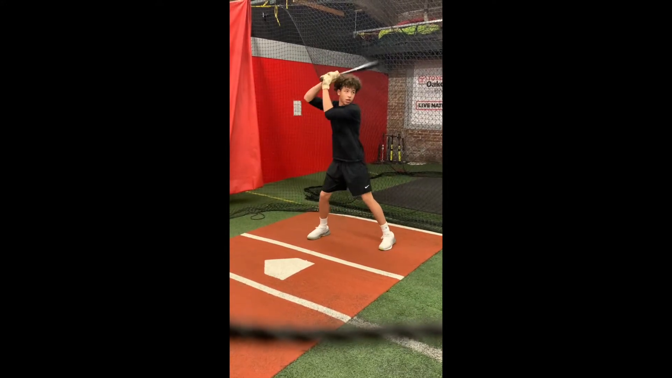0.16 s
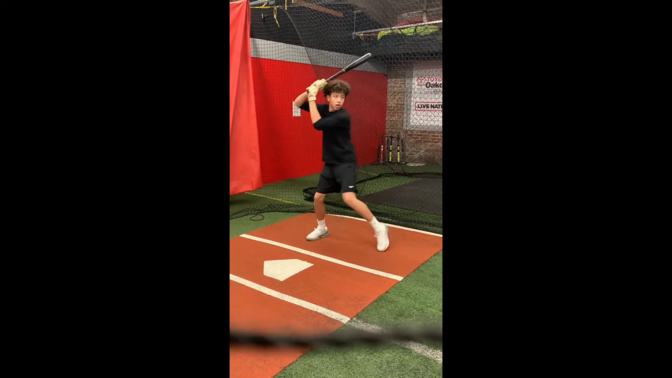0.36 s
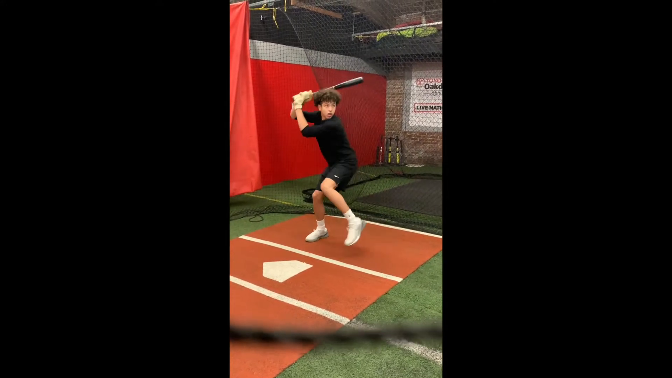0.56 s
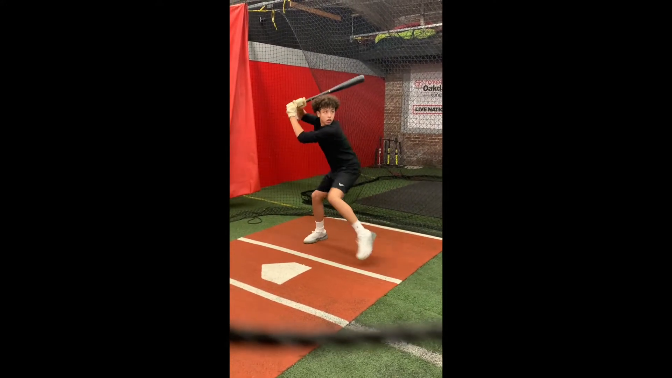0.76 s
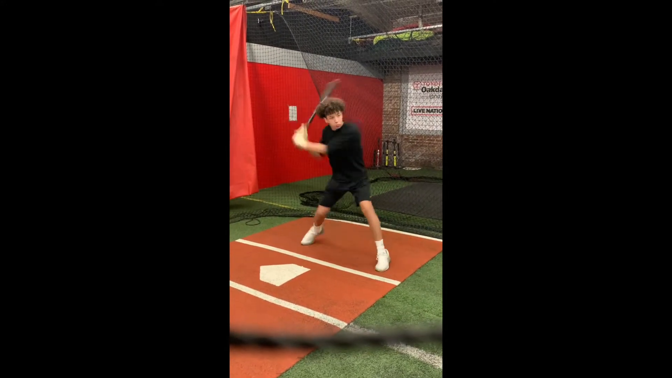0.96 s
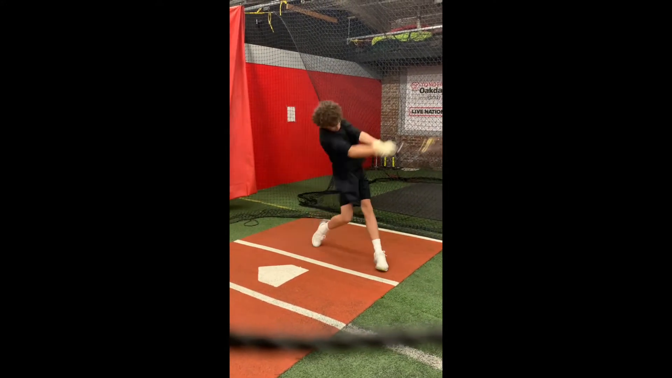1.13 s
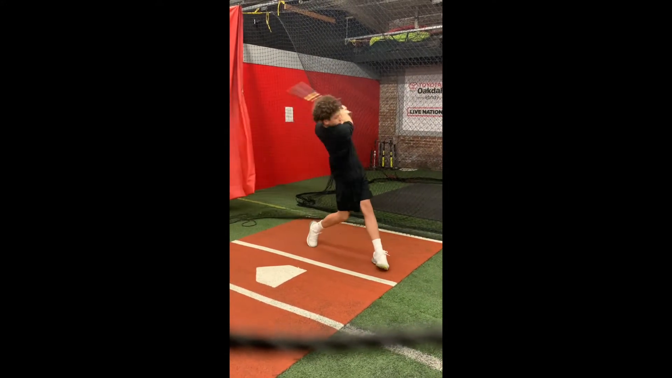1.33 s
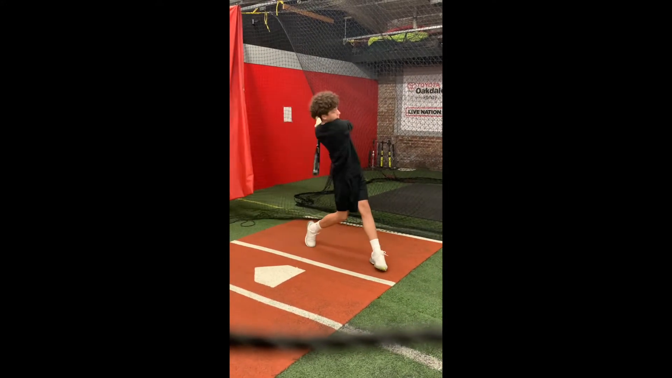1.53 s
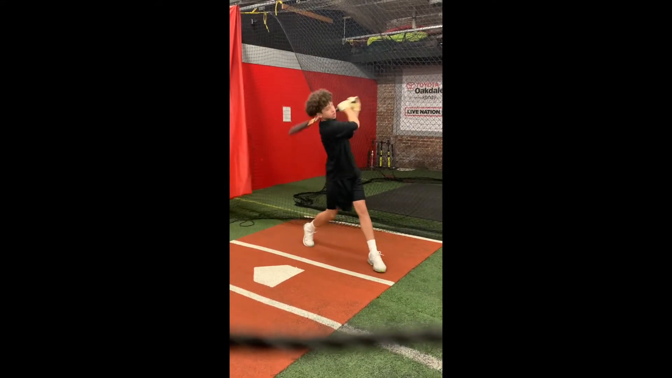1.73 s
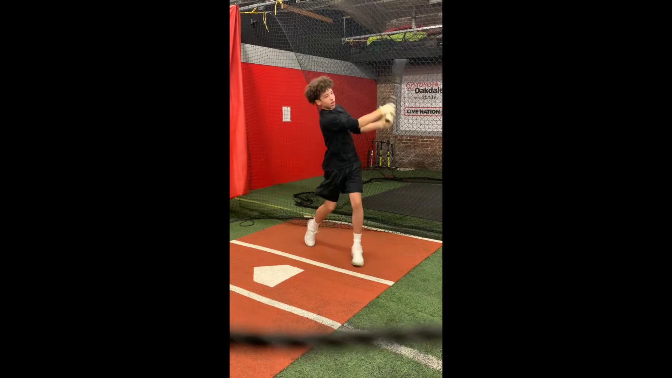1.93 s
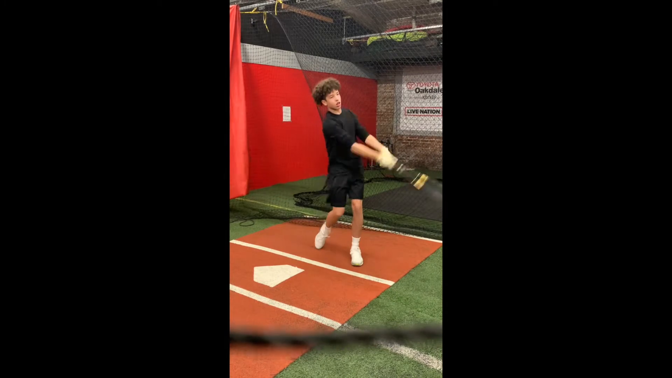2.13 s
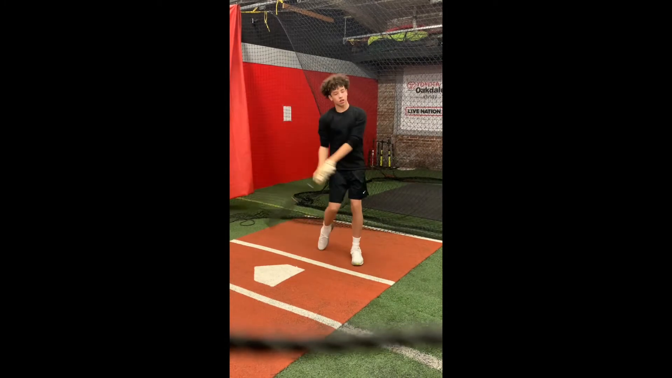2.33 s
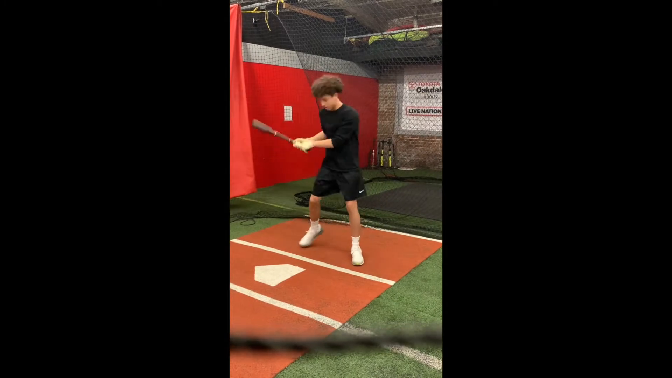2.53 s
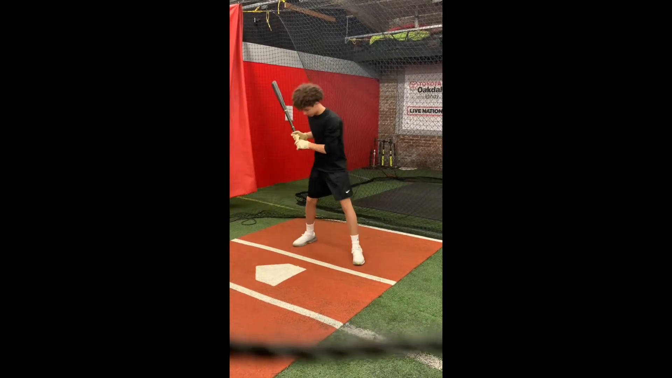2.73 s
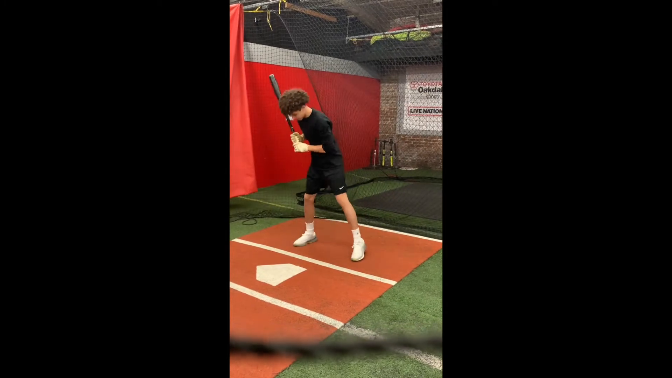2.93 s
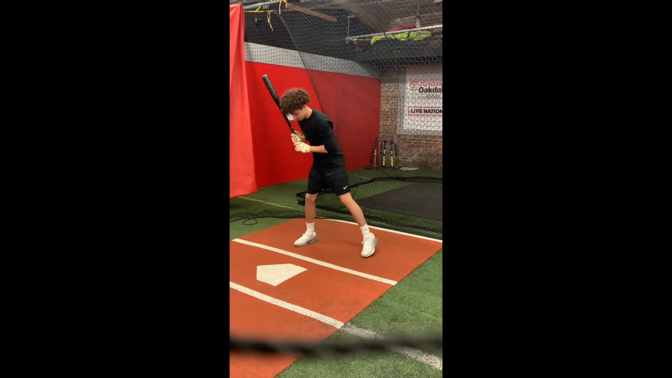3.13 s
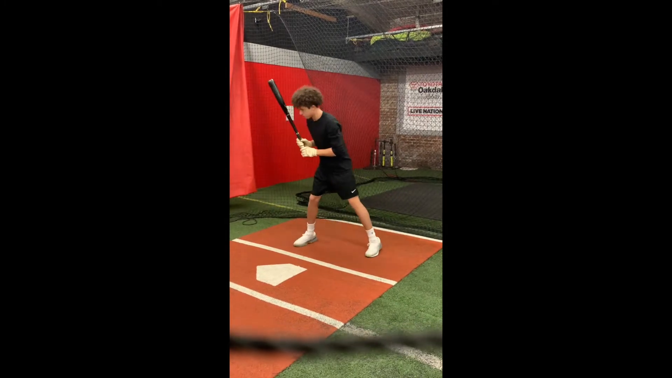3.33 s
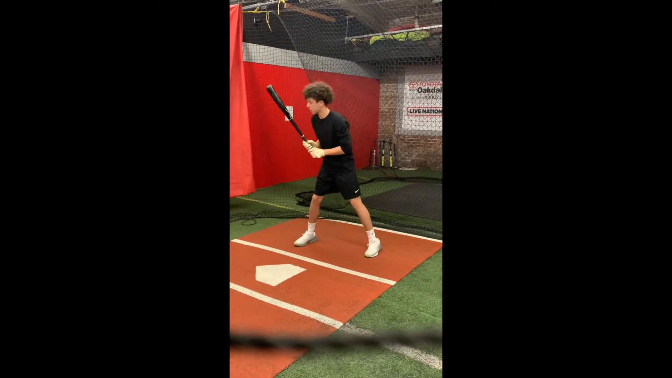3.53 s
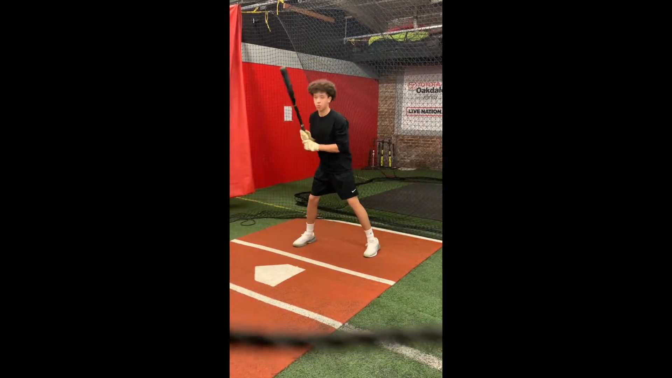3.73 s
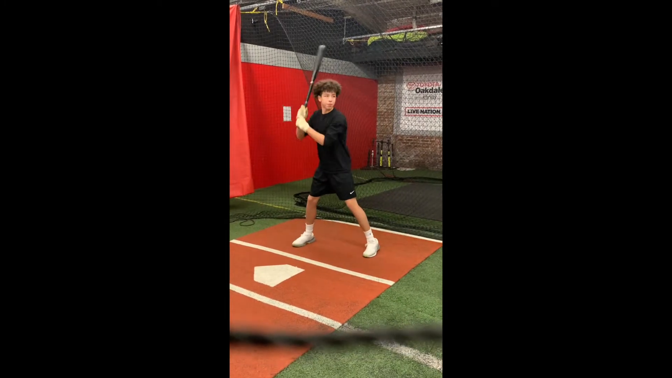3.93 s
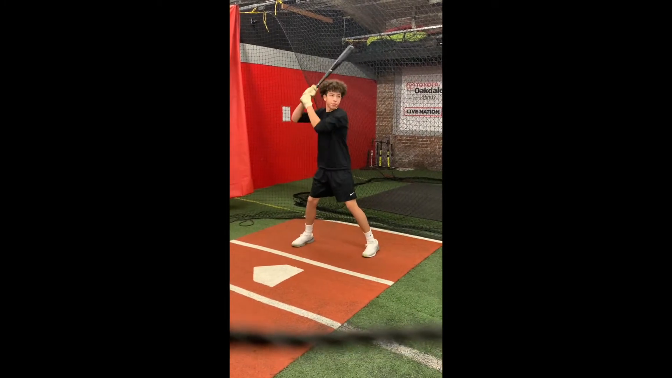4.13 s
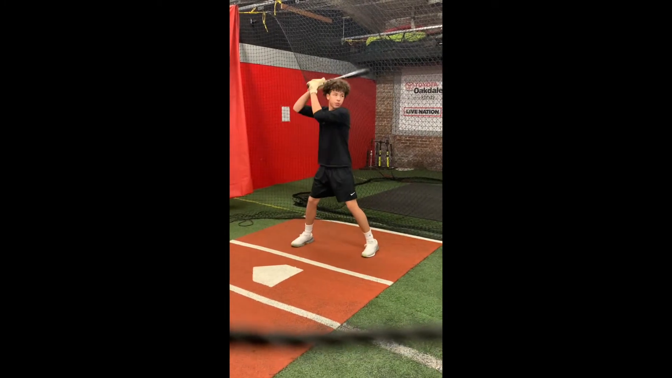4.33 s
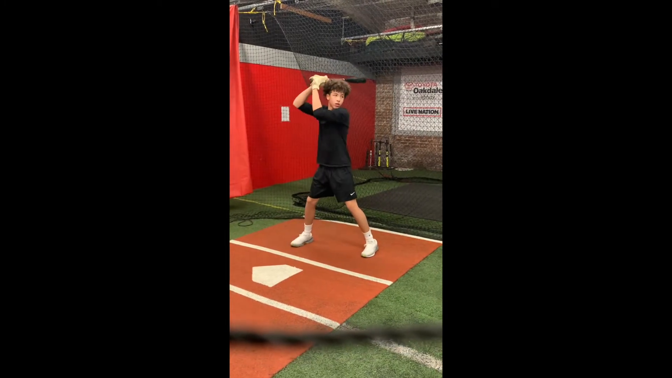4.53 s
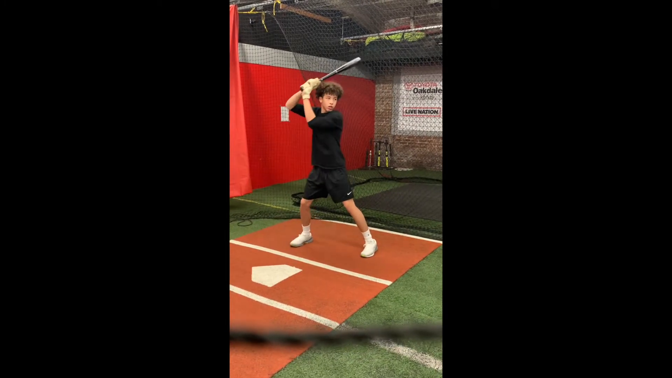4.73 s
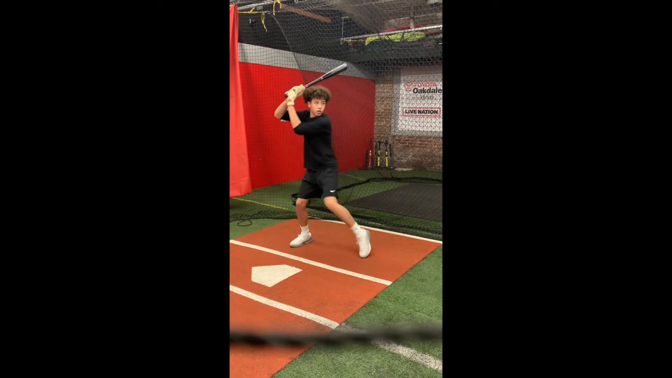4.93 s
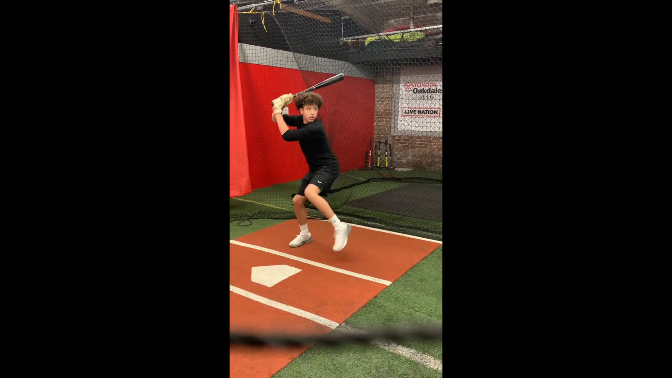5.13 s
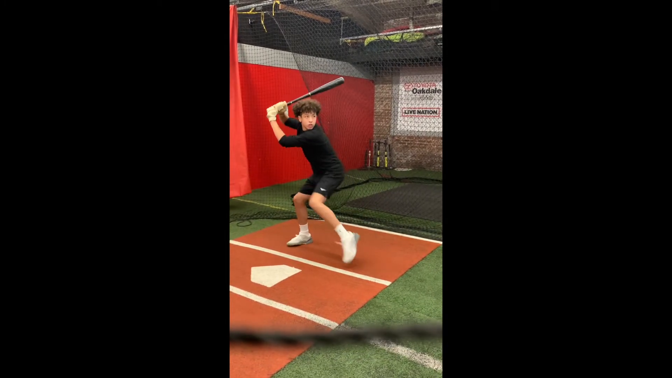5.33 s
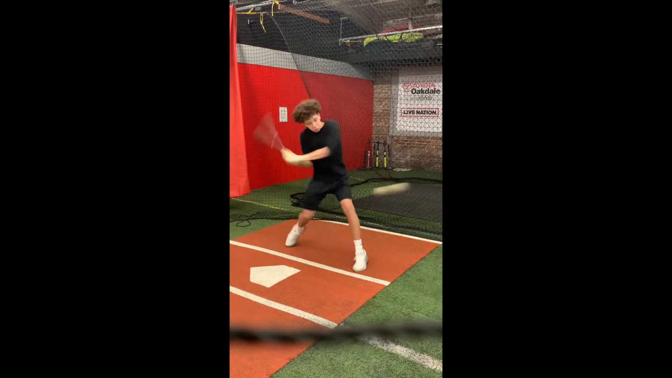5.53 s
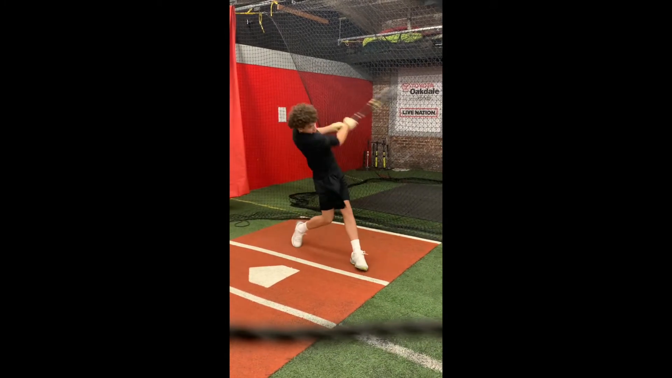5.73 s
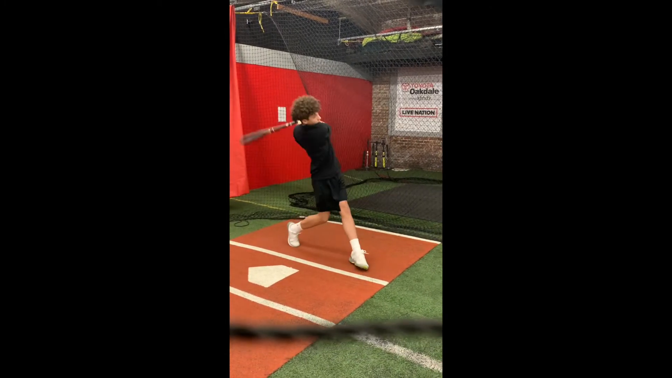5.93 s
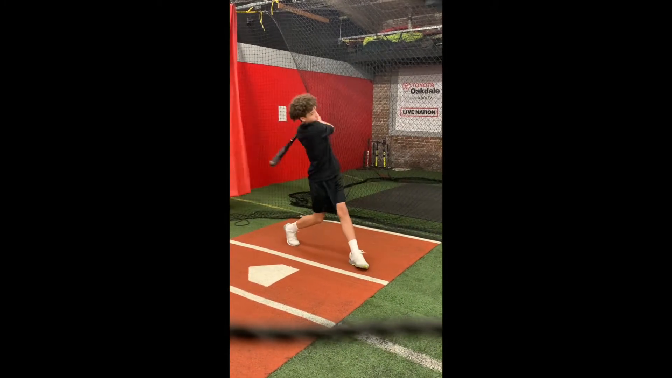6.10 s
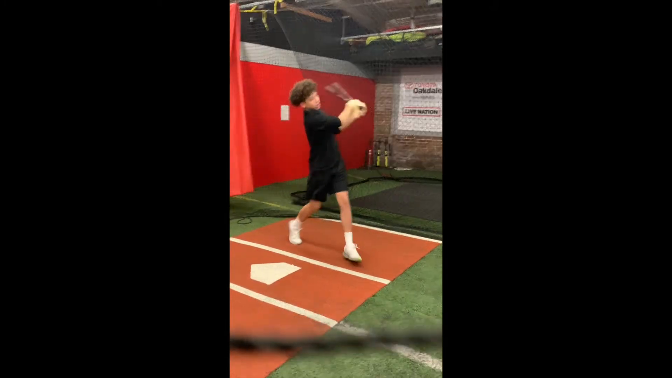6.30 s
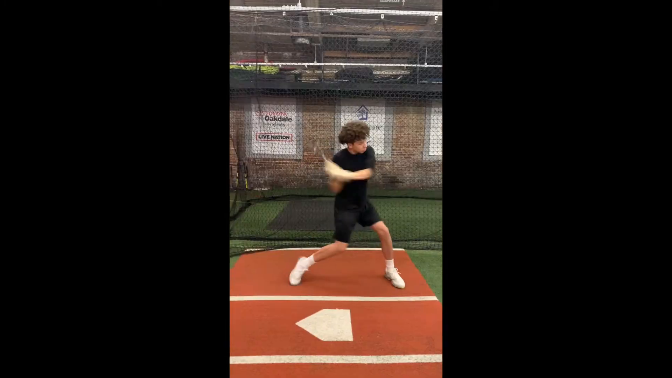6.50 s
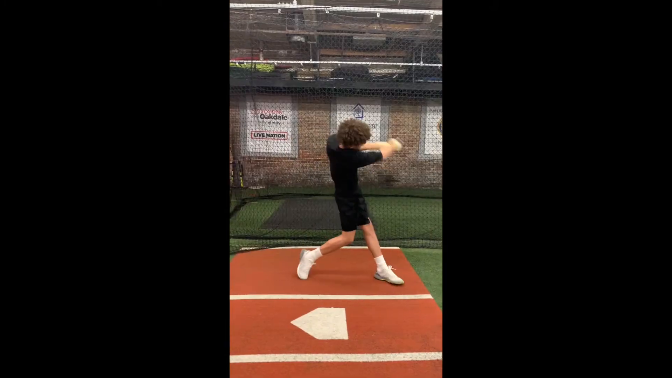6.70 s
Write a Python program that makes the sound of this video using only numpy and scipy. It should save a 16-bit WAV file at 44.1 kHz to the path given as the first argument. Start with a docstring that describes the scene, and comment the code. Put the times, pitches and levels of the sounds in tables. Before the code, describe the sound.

Indoor batting cage with a low, steady ventilation rush and hum. A bat cracks a ball early on, bright and hard with a clattering hall echo; the ball whizzes off briefly and slaps into netting. Shoes scuff faintly, then a long quiet stretch. A second crack lands, the sound drops out for an instant, and a third crack follows. Recorded a few metres away, the level ducking after each hit.

```python
"""An indoor batting cage: three pitched balls are hit, over the hum of the ventilation. Each crack is a sum of
dying barrel tones and a sharp click; the wall and the hall send it back. Shaped noise makes the whoosh before a
hit, the ball in the netting, rustling clothes and shoes on the mat. A gain control ducks the sound after each
hit, and the sound falls silent briefly before the last swing."""
import sys
import numpy as np
from scipy import signal
from scipy.fft import rfft, irfft
from scipy.io import wavfile
from scipy.ndimage import uniform_filter1d, minimum_filter1d

SR = 44100
rng = np.random.default_rng(int(sys.argv[2]) if len(sys.argv) > 2 else 0)


def inscribe(sig):
    """Save sig as 16-bit PCM at rate SR to the path in sys.argv[1].

    A 1-D sig is mono; a 2-D sig holds one channel per row.
    Samples are clipped to [-1, 1] before scaling.
    """
    pcm = np.round(np.clip(np.atleast_2d(sig).T, -1, 1) * 32767)
    wavfile.write(sys.argv[1], SR, pcm.astype(np.int16))


N = 302510
T = np.arange(N) / SR  # time of every sample in seconds


def amp(db):
    """Turn decibels into a factor."""
    return 10 ** (np.asarray(db) / 20)


def evened(x):
    """Scale a signal to an average power of 1."""
    return x / np.sqrt(np.mean(x ** 2) + 1e-20)


def smooth_noise(shape, size):
    """Random numbers averaged over `size` neighbours, so that they wander slowly."""
    return uniform_filter1d(rng.standard_normal(shape), size=size)


def read(points, hz):
    """Read a curve between its points, on a logarithmic frequency scale."""
    f, value = np.transpose(points)
    return np.interp(np.log(hz + 1), np.log(f + 1), value)


def octave_tilt(hz):
    """How far a treble tilt has come at each frequency: nearly nothing in the bass, 1 at 1 kHz."""
    return np.log2(1 + hz / 1000)


def add(mix, s, sound):
    """Lay a sound into the mix, starting at s seconds."""
    part = mix[:, round(s * SR):][:, :sound.shape[-1]]
    part += sound[..., :part.shape[1]]


def lifted(spectrum, centre_hz, lift_db):
    """A spectrum lifted round one broad resonance."""
    hz = np.geomspace(100, 16000, 100)
    bump = np.exp(-(np.log2(hz / centre_hz) / .25) ** 2)
    return np.column_stack([hz, read(spectrum, hz) + lift_db * bump])


# The recorder's stereo phase: f/Hz, lead of the left channel/half turns
STEREO_PHASE = [(20, 0), (120, -.02), (400, -.08), (900, -.22), (2100, .38), (3400, .42), (4700, 1),
                (5000, 1), (6350, 2), (7100, 2), (8450, 3), (9500, 3), (10400, 4), (11650, 4), (12500, 5),
                (13700, 5), (14500, 6)]
# Sound from all sides: f/Hz, likeness of left and right (1 = the same)
LIKENESS = [(140, .9995), (300, .96), (650, .78), (1200, .56), (2500, .62), (4500, .98), (7000, .997)]


def noise(spectrum, size, tilt_db=0):
    """Noise from all sides on two channels, less alike where the channels are a quarter turn apart."""
    hz = np.fft.rfftfreq(size, 1 / SR)
    a, b = rfft(rng.standard_normal((2, size)))
    phase_limit = 1 - .5 * np.sin(np.pi * read(STEREO_PHASE, hz)) ** 2
    same = np.clip(np.minimum(read(LIKENESS, hz), phase_limit), 0, 1)
    mid, side = a * np.sqrt(1 + same), b * np.sqrt(1 - same)
    colour = amp(read(spectrum, hz) + tilt_db * octave_tilt(hz))
    return evened(irfft(np.array([mid + side, mid - side]) * colour, size))


def narrow(hz, width_hz):
    """A second of noise in one narrow band."""
    band = [(hz - 2 * width_hz, -90), (hz - width_hz / 2, -3), (hz, 0),
            (hz + width_hz / 2, -3), (hz + 2 * width_hz, -90)]
    return noise(band, SR)


def click(spectrum, size=1024):
    """The shortest pulse with this spectrum that does not start early, of energy 1."""
    log_gain = np.log(amp(read(spectrum, abs(np.fft.fftfreq(size, 1 / SR)))))
    pulse = np.fft.ifft(np.exp(np.conj(signal.hilbert(log_gain)))).real
    return pulse / np.linalg.norm(pulse)


def ring(modes, t):
    """A sum of dying sines: each loses 60 dB in its time t60."""
    return sum(amp(db - 60 * t / t60) * np.sin(2 * np.pi * hz * t) for hz, db, t60 in modes)


def burst(spectrum, rise, decay, tilt_db=0):
    """A swell of noise that peaks a quarter of a second in."""
    t = T[:SR] - 1 / 4
    return noise(spectrum, SR, tilt_db) * np.exp(-abs(t) / np.where(t < 0, rise, decay))


def add_burst(mix, peak_s, db, *shape):
    """Lay a burst into the mix so that it peaks at peak_s."""
    add(mix, peak_s - 1 / 4, amp(db) * burst(*shape))


def held(start, stop, rise, decay):
    """A level curve that rises up to start, holds until stop and dies away."""
    return np.exp(np.minimum(T - start, 0) / rise - np.maximum(T - stop, 0) / decay)


# The three hits: t of the snap/s, squashing time of the ball/s, level/dB, hall level/dB,
# hall treble/dB per octave, wall echo level/dB, thump level/dB, wall distance/factor,
# f of the snap's centre/Hz, tail length/factor, clothes level/dB (levels are relative)
HITS = [(1.0089, 0.0012, 1, 5, 1, 1, -1.5, .98, 6480, 0.97, -52.5),
        (5.5366, 0.002, 6.5, -0.5, 0, -3.5, -11, 0.81, 6310, 1, -51.5),
        (6.5395, 0.0016, -2, 7, -1.5, -1.5, 0, 1.04, 8000, 0.84, -60)]
# Snap at contact: f/Hz, level/dB
SNAP = [(200, -15.5), (1000, -10.5), (3000, 3), (5000, 1), (7200, -1), (10000, -6), (16000, -19)]
# The blow as it fills the hall: f/Hz, level/dB
BLOW = [(60, -27), (200, -7), (400, -9), (700, -3), (1100, -1), (1600, -2.5), (2050, -4.5), (2700, -1.5),
        (3800, -7.5), (4800, -6.5), (7000, -16.5), (10000, -24), (15500, -26.5)]
# The snap as the wall returns it: f/Hz, level/dB
WALL = [(200, -20), (1000, -7), (3000, 0), (5000, 0), (7000, -4), (10000, -12), (16000, -18)]
# How the barrel feeds the hall: f/Hz, level/dB
RADIATED = [(300, -34), (600, -16), (1100, 2.5), (1700, -0.5), (2500, 3), (4000, -16.5), (8000, -2.5),
            (16000, -16)]
# Echoes of near surfaces: delay t/s before the distance factor, relative level/dB
ECHOES = [(.0046, -11), (0.0131, -11), (0.0154, 0), (0.0167, -15), (.0273, -21.5), (0.039, -19)]
# Slaps from far walls and ceiling: delay t/s, treble/dB per octave, level/dB in hit 1, 2, 3
FAR_ECHOES = [(0.0386, -2.5, 7.5, -2, -4), (0.0531, 0.5, -7.5, -13.5, 10.5), (.064, 2, -6, -18.5, 13),
              (.0875, -0.5, 8.5, 1, 6), (.106, -2.5, -2.5, -6.5, -2)]
# Narrow resonances that linger in the hall: f/Hz, width/Hz, t60/s, level/dB in hit 1, 2, 3
LINGER = [(775, 110, 0.53, -37, -39, -16), (1088, 47, 0.62, -24, -20, -34),
          (1190, 40, 0.54, -29.5, -40, -20), (1650, 50, .4, -13.5, -30.5, -28),
          (1760, 36, 0.47, -22, -17, -28), (1872, 53, .4, -33.5, -20, -35), (2635, 300, .35, -25, -35, -16),
          (3414, 250, 0.45, -30.5, -27, -19.5)]
LEAD_S = .01  # the knock builds up for this long before the snap
THUMP_AT_S, THUMP_WIDTH_S = 0.0027, 0.0011  # counted from the snap


def bat(strengths_db, far_db, linger_db, squash, level_db, hall_db, tilt_db, wall_db, thump_db,
        distance, snap_hz, tail):
    """The barrel knocks as the ball is squashed, with a snap at the deepest point; walls and hall answer."""
    t, out = T[:SR], np.zeros((2, SR))
    barrel = knock(strengths_db, squash)
    add(out, 0, barrel)
    add(out, LEAD_S, amp(22.0) * click(lifted(SNAP, snap_hz, 5.3)))
    # the flattened ball springs back just after the snap
    spring = (t - THUMP_AT_S) / THUMP_WIDTH_S
    add(out, LEAD_S, -amp(thump_db) * (1 - 2 * spring ** 2) * np.exp(-spring ** 2))
    for delay, db in ECHOES:
        # rough surfaces smear each echo
        scatter = amp(0.5) * noise(SNAP, 1024, -0.4) * np.exp(-t[:1024] / 0.0016)
        echo = click(WALL) * amp(13.5) + scatter
        add(out, LEAD_S + delay * distance, amp(db + wall_db) * echo)
    for (delay, treble_db, *_), db in zip(FAR_ECHOES, far_db):
        slap = [(hz, gain_db + treble_db * octave_tilt(hz)) for hz, gain_db in BLOW]
        add(out, LEAD_S + delay, amp(db) * click(slap))
    for (hz, width_hz, t60, *_), db in zip(LINGER, linger_db):
        swell = 1 - np.exp(-t / 0.014)
        add(out, LEAD_S, amp(db - 60 * t / t60) * swell * narrow(hz, width_hz))
    add(out, LEAD_S, amp(20.5 + hall_db) * hall(BLOW, tilt_db, tail))
    barrel_in_hall = signal.fftconvolve(barrel[None], hall(RADIATED, length=tail), axes=1)[:, :SR]
    out += amp(-10.0) * barrel_in_hall
    return amp(level_db) * out


# Tones of bat and ball; where the ball meets the barrel sets their strength:
# f/Hz, t60/s, level/dB in hit 1, 2, 3
BARREL = [(365, 0.011, -2.5, -14, 1), (584, 0.0085, 8, -0.5, -6), (752, .017, -15.5, 0.5, 8.5),
          (1052, 0.021, 4.5, -5.5, -6), (1159, .017, -8.5, -2.5, 4), (1300, 0.018, -12.5, -4.5, -3),
          (1501, 0.011, 1.5, -11, 4), (1616, 0.021, -2, -2.5, -6), (1772, 0.013, -4, -2, -14),
          (2645, .012, -7.5, -12, -5), (2920, .012, -6, -6.5, -15), (3410, .011, -22.5, -13.5, -6),
          (3640, 0.0083, -10.5, -1.5, -23), (6500, 0.008, -8.5, -15, -12)]
# bending waves run slower the lower they are: time to crest at 1 kHz, and their start ahead of the snap
TRAVEL_S, HEAD_START_S = 0.00428, .0032


def knock(strengths_db, squash):
    """Each tone swells while the ball is squashed, then dies; the high ones crest first."""
    out = np.zeros(SR)
    for (hz, t60, *_), db in zip(BARREL, strengths_db):
        age = T[:SR] - LEAD_S + HEAD_START_S - TRAVEL_S / np.sqrt(hz / 1000)
        swell = np.exp(-(np.minimum(age, 0) / squash) ** 2)
        dying = amp(db - 60 * np.maximum(age, 0) / t60)
        out += dying * swell * np.cos(2 * np.pi * hz * age)
    return out


# How long the hall rings: f/Hz, t60/s before the tail-length factor
HALL = [(100, 1), (500, 0.88), (1100, 0.6), (1800, 0.6), (3000, 0.56), (6000, 0.62), (10000, 0.54),
        (16000, 0.2)]
CLATTER_DB, CLATTER_FADE_S = 2.5, 0.67
BEFORE_WALL_DB = -5  # the tail is faint until the nearest wall answers


def hall(spectrum, tilt_db=0, length=1, first=0.014, patchy_db=2.0):
    """A noise tail of energy 1 that clatters in uneven patches; each pitch range dies at its own speed."""
    hz, t, z = signal.stft(noise(spectrum, SR, tilt_db), SR, nperseg=512)
    patches = uniform_filter1d(rng.standard_normal(z.shape[1:]), size=5, axis=0)
    patches = evened(uniform_filter1d(patches, size=2, axis=1))
    fall_db = 60 * t / (length * read(HALL, hz)[:, None])
    tail = signal.istft(z * amp(patchy_db * patches - fall_db), SR, nperseg=512)[1][:, :SR]
    t = T[:SR]
    clatter_db = CLATTER_DB * np.exp(-t / CLATTER_FADE_S) * evened(smooth_noise(SR, 50))
    onset = np.where(t < first, amp(BEFORE_WALL_DB), 1 + 0.55 * np.exp(-t / 0.016))
    return evened(tail * amp(clatter_db) * onset) / np.sqrt(SR)


# The low whoosh: f/Hz, level/dB
SWISH = [(40, -17.5), (130, 9), (300, -16), (1000, -14.5), (3500, -23.5), (7000, -22.5), (10000, -39.5),
         (16000, -60)]


def swish(size=4096):
    """A low whoosh grows before each hit, with a short steep hiss just ahead of the crack."""
    before = T[:size][::-1]
    hiss = amp(-6.5) * noise(BLOW, size, 2.3) * np.exp(-before / 0.0024)
    whoosh = amp(-14.5) * noise(SWISH, size) * np.exp(-before / 0.0079)
    return whoosh + hiss


# The first ball whizzes off: start t/s, length/s
WHIZZ = (1.016, .112)
WHIZZ_HZ, WHIZZ_SAG_HZ_PER_S, WHIZZ_DB = 2560, 2400, -16.5  # pitch and level at the start


def whizz(s, length):
    """A breathy, fluttering whistle that falls as the ball flies off."""
    t = T[:round(length * SR)]
    flutter = smooth_noise((2, len(t)), 350)
    turn = 2 * np.pi * np.cumsum(WHIZZ_HZ - WHIZZ_SAG_HZ_PER_S * t) / SR
    tone = evened(flutter[0] * np.cos(turn) + flutter[1] * np.sin(turn))
    return s, amp(WHIZZ_DB - 28 * t) * signal.windows.tukey(len(t), .2) * tone


# Shoes scuff and tap the mat as the batter recovers:
# t/s, level/dB, rise/s, decay/s, treble/dB per octave
STEPS = [(1.484, -45.5, 0.0051, 0.026, 3), (1.692, -51.5, .006, .022, -1), (1.871, -49, 0.068, 0.033, -6.5),
         (2.065, -54, 0.0042, 0.027, 4), (2.82, -59, 0.09, 0.086, -4), (6.017, -40, .001, 0.018, 8),
         (6.117, -35.5, 0.00074, 0.0083, 7), (6.233, -40.5, 0.0044, 0.016, 3.5),
         (6.278, -38.5, 0.007, 0.014, 1.5), (6.362, -44, 0.0062, 0.0077, 0),
         (6.472, -43.5, 0.0041, 0.069, -14)]
# Single ticks and knocks: late echoes of the third hit, and tugs in the netting:
# t/s, level/dB, decay/s, treble/dB per octave
TICKS = [(1.396, -51, 0.0099, 13), (1.443, -46.5, 0.0076, 8), (1.57, -53, 0.013, 9.5),
         (1.628, -50, 0.0068, 3), (5.776, -24.5, .006, 2.5), (5.822, -26, .007, 7.5),
         (6.603, -20, 0.0019, 8), (6.6455, -11, 0.0037, -7.5), (6.757, -29.5, 0.0049, -1)]
# The ball stops in the backstop: f/Hz, level/dB
THUD = [(30, -30), (80, -11.5), (160, 3.5), (300, 6), (900, -27.5), (2500, -16), (8000, -74)]
SOLE_HZ, NET_HZ = 6400, 3600  # resonance of the soles and of the net


def cage():
    """Grainy rubbing of net and cloth, steps, ticks and each ball's dull stop, with the hall behind."""
    grain_db = 2.8 * evened(smooth_noise(N, 70))
    out = (clothes() + netting()) * evened(amp(grain_db)) + rattle()
    for s, db, rise, decay, tilt_db in STEPS:
        add_burst(out, s, db, scuff_colour(SOLE_HZ), rise, decay, tilt_db)
    for s, db, decay, tilt_db in TICKS:
        add_burst(out, s, db, scuff_colour(NET_HZ), .001, decay, tilt_db)
    for _, stop, _, _, thud_db, *_ in CATCHES:
        add_burst(out, stop, thud_db, THUD, .015, .045)
    in_hall = signal.fftconvolve(out.mean(0)[None], hall(SCUFF), axes=1)[:, :N]
    return amp(1.5) * out + amp(-6.5) * in_hall


# Each ball runs into the netting: touch t/s, stop t/s, slap level/dB, drag level/dB, thud level/dB,
# swaying level/dB, treble/dB per octave (levels are relative)
CATCHES = [(1.142, 1.302, -24.5, -39, -39, -62, 5), (5.784, 5.824, -27, -32, -32, -46.5, 4),
           (6.765, 6.844, -21.5, -37, -37, -55, 8.5)]
SLAP_RISE_S, SLAP_DECAY_S, SLAP_TILT_DB = 0.011, 0.024, -2  # the tilt adds to the ball's own treble
DRAG_RISE_S, DRAG_DECAY_S = 0.017, 0.04
SWAY_FALL_DB_PER_S, SWAY_TILT_DB = 11.5, 3.5
# the net twitches as it settles, ever more faintly
TWITCH_GAP_S, TWITCH_DB, TWITCH_FALL_DB_PER_S, TWITCH_TILT_DB = 0.065, -45.5, 23, 4
TWITCH_RISE_S, TWITCH_DECAY_S = .008, 0.036


def netting(count=12):
    """The ball slaps the net and drags it along until it stops; the net sways and twitches to rest."""
    out, mesh = np.zeros((2, N)), scuff_colour(NET_HZ)
    for touch, stop, slap_db, drag_db, _, sway_db, tilt_db in CATCHES:
        add_burst(out, touch, slap_db, mesh, SLAP_RISE_S, SLAP_DECAY_S, tilt_db + SLAP_TILT_DB)
        drag = held(touch + DRAG_RISE_S, stop, DRAG_RISE_S / 2, DRAG_DECAY_S)
        out += amp(drag_db) * noise(mesh, N, tilt_db) * drag
        sway = amp(sway_db - SWAY_FALL_DB_PER_S * abs(T - stop)) * (T > stop)
        out += sway * noise(SCUFF, N, SWAY_TILT_DB)
        delays = TWITCH_GAP_S * (1 + np.arange(count) + rng.random(count))
        twitches = [amp(TWITCH_DB - TWITCH_FALL_DB_PER_S * d)
                    * held(stop + d, stop + d, TWITCH_RISE_S, TWITCH_DECAY_S) for d in delays]
        out += np.max(twitches, axis=0) * noise(SCUFF, N, TWITCH_TILT_DB)
    return out


# Cords and fittings of the net: f/Hz, t60/s, relative level/dB
FITTINGS = [(1124, .03, 0), (1520, 0.027, -5), (1910, 0.018, -1), (2370, 0.022, 4.5), (2875, 0.011, 2),
            (3517, .016, -4.5), (4220, 0.024, 0.5), (6020, 0.0072, -3.5), (7100, .007, 2.5),
            (11200, .005, -13)]
RATTLE_PER_S = 260  # ticks of all fittings together
RATTLE_SPREAD_DB, RATTLE_DB, RATTLE_DECAY_S = 5, -41, 0.097


def rattle():
    """Cords and fittings tick at random while a ball shakes the net, then fade once it has stopped."""
    out = np.zeros((2, N))
    for hz, t60, db in FITTINGS:
        struck = rng.random(N) < RATTLE_PER_S / len(FITTINGS) / SR
        ticks = struck * amp(RATTLE_SPREAD_DB * np.minimum(rng.exponential(size=N), 3))
        angle = np.pi / 4 + rng.uniform(-0.62, 0.83, N)  # each tick has its own place, left to right
        placed = ticks * np.array([np.cos(angle), np.sin(angle)])
        out += signal.oaconvolve(placed, ring([(hz, db, t60)], T[:2048])[None], axes=1)[:, :N]
    shaking = sum(held(touch, stop, DRAG_RISE_S / 2, RATTLE_DECAY_S) for touch, stop, *_ in CATCHES)
    return amp(RATTLE_DB) * evened(out) * shaking


# Rubbing of net, cloth and soles: f/Hz, level/dB
SCUFF = [(150, -5.5), (700, 2), (2000, 2), (3500, 0.5), (6500, -6), (9000, -9), (12000, -23.5),
         (16000, -28)]


def scuff_colour(centre_hz):
    """The spectrum of rubbing on a surface with one resonance."""
    return lifted(SCUFF, centre_hz, 3.3)


# clothes rustle more and more as the batter loads and swings, then calm down
REST_DB, LOAD_DB_PER_S, CALM_DB_PER_S = -79.5, 44, 24


def clothes(lumps_db=2):
    """The rustle of cloth grows fitfully up to each hit and fades after it."""
    swings = [amp(db + np.minimum(LOAD_DB_PER_S * (T - s), CALM_DB_PER_S * (s - T)))
              for s, *_, db in HITS]
    folds = evened(smooth_noise(N, 1800))
    moving_power = amp(lumps_db * folds) ** 2 * sum(g ** 2 for g in swings)
    return np.sqrt(amp(REST_DB) ** 2 + moving_power) * noise(SCUFF, N)


# Colour of the ventilation's rush: f/Hz, relative level/dB per Hz
AIR = [(15, -49.5), (25, -26), (50, -6.5), (90, -5.5), (120, -4), (170, -5.5), (210, -8.5), (330, -14),
       (430, -16), (560, -21.5), (1100, -26.5), (2700, -36.5), (3800, -42.5), (5100, -43), (7500, -61.5),
       (11000, -67), (15000, -77.5)]
# Loudness of the rush: t/s, level/dB
AIR_DB = [(0, -38), (.9, -38), (2.2, -39), (3.5, -39), (4.4, -39.5), (5.2, -36.5), (6.86, -39)]
# Fan and mains tones: f/Hz, level/dB at the average rush, unsteady part/share of the steady part
HUM = [(88.8, -45, 8.4), (120.05, -35.5, 0.2), (161.26, -35, 0.11), (240.7, -59, .3), (323.4, -54, 0.27),
       (402.5, -49.5, 0.11), (483, -58.5, 0.51), (597, -67, 0.48), (729, -63.5, 0.24)]


def ventilation():
    """Rush of air and the wavering tones of fan motors and mains, swelling together."""
    level_db = np.interp(T, *np.transpose(AIR_DB))
    out = noise(AIR, N) * amp(level_db)
    offset_hz = np.fft.fftfreq(N, 1 / SR)
    for hz, db, waver in HUM:
        wander = rng.standard_normal(N) + 1j * rng.standard_normal(N)
        # keep only slow wandering, a few times a second
        flutter = np.fft.ifft(np.fft.fft(wander) / (1 + (offset_hz / 5.6) ** 2))
        carrier = np.exp(2j * np.pi * (hz * T + rng.random()))
        tone = (1 + waver * flutter / flutter.std()) * carrier
        out += amp(db + 1.2 * (level_db - level_db.mean())) * evened(tone.real)
    return out


def scene():
    """Three swings over the sounds of the cage and the ventilation."""
    out = ventilation() + cage()
    for k, (s, *blow, _) in enumerate(HITS):
        rush = swish()
        add(out, s - rush.shape[1] / SR, rush)
        # the last three columns of these tables belong to the three hits
        strengths = [np.transpose(table)[k - len(HITS)] for table in (BARREL, FAR_ECHOES, LINGER)]
        add(out, s - LEAD_S, bat(*strengths, *blow))
    add(out, *whizz(*WHIZZ))
    return out


# The brief silence: start t/s, stop t/s
PAUSE = (6.383, 6.463)
EDGE_HZ = 15900  # upper band limit


def record(dry):
    """Stereo phase, gain control that holds and recovers, soft overload, a brief silence and band limit."""
    lead = np.pi * read(STEREO_PHASE, np.fft.rfftfreq(N, 1 / SR))
    x = irfft(rfft(dry) * np.exp(.5j * lead * np.array([[1], [-1]])), N)
    power_db = 10 * np.log10(abs(uniform_filter1d((x ** 2).mean(0), size=300)) + 1e-12)
    over_db = np.maximum(power_db + 12, 0) * 0.85
    # the gain stays down for 0.11 s, then climbs back at 70 dB per second
    hold = int(.11 * SR) // 2
    held_db = -minimum_filter1d(-over_db, 2 * hold + 1, origin=hold)
    recovery_db = 70 * T
    duck_db = np.maximum.accumulate(held_db + recovery_db) - recovery_db
    x = np.tanh(x * amp(-uniform_filter1d(duck_db, size=60)))
    x = signal.sosfilt(signal.butter(2, 22, "high", fs=SR, output="sos"), x)
    silent = (T > PAUSE[0]) & (T < PAUSE[1])
    x *= 1 - uniform_filter1d(1. * silent, size=60)  # soft edges
    low_pass = signal.firwin(511, EDGE_HZ, window=("kaiser", 9), fs=SR)
    return signal.oaconvolve(x, low_pass[None], "same", axes=1)


dry = scene()
out = record(dry)
inscribe(out)
```